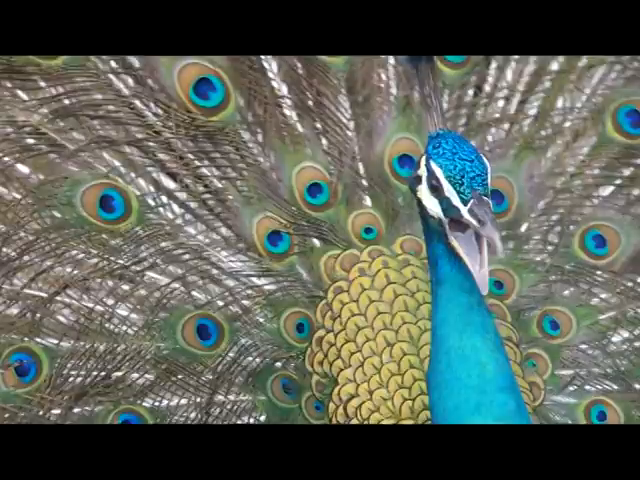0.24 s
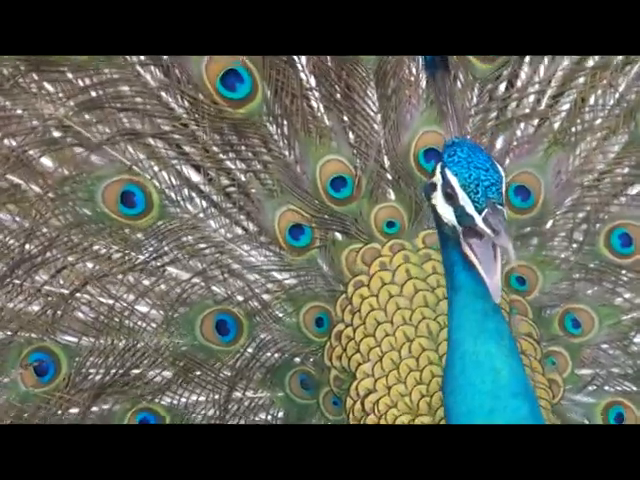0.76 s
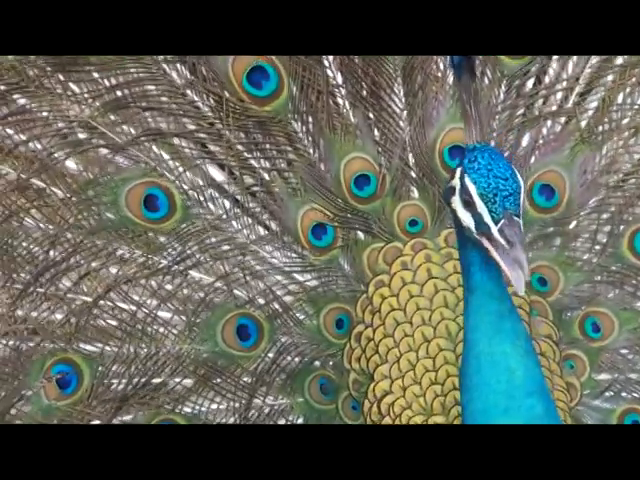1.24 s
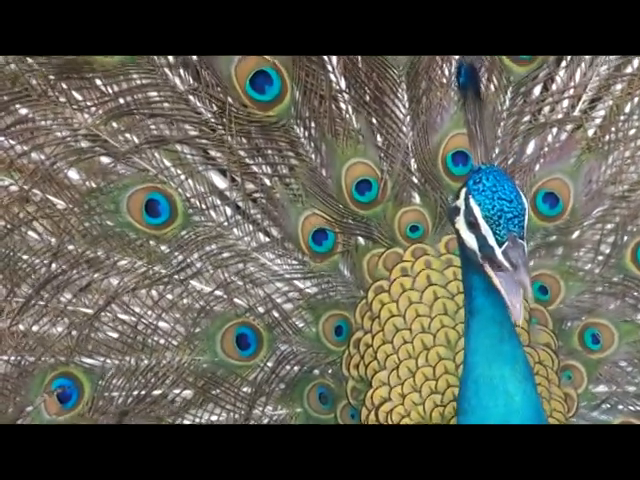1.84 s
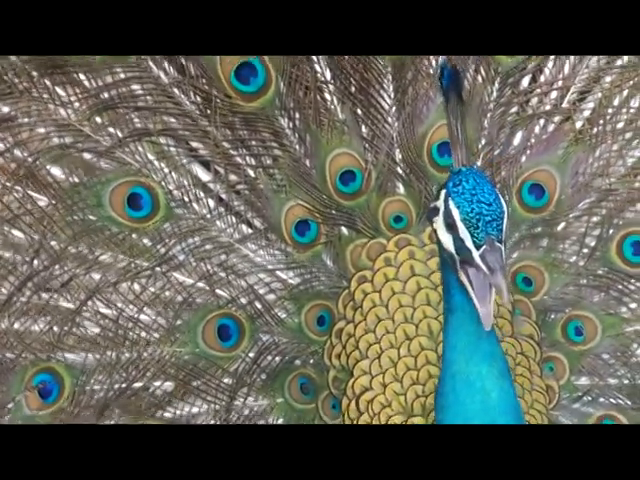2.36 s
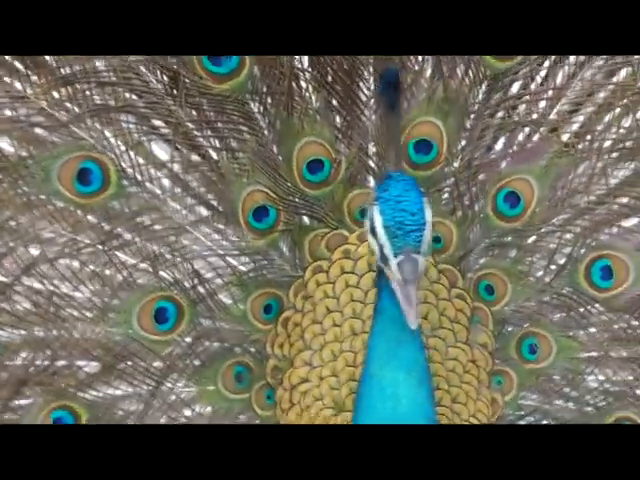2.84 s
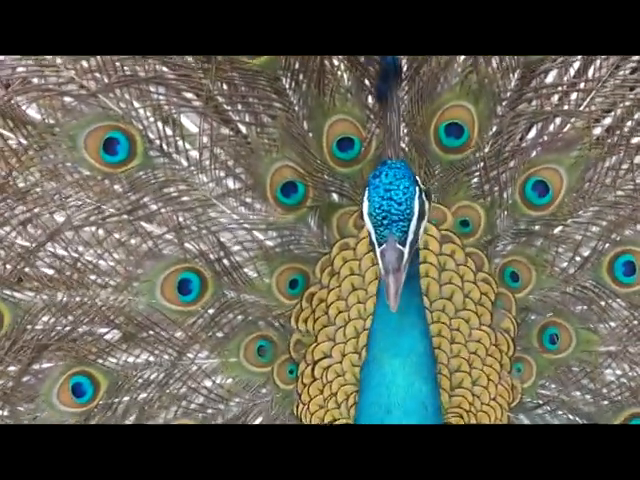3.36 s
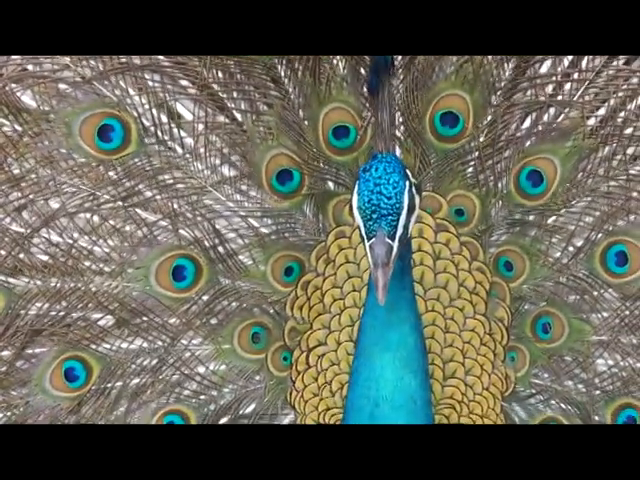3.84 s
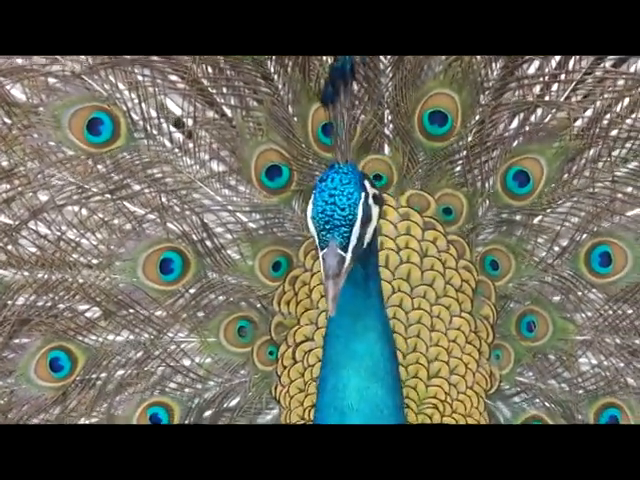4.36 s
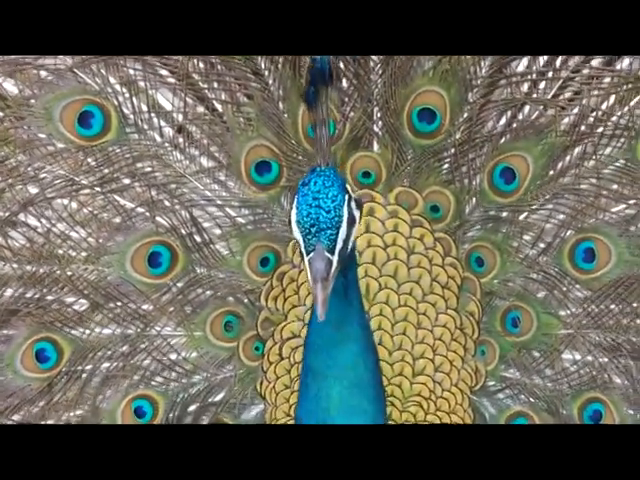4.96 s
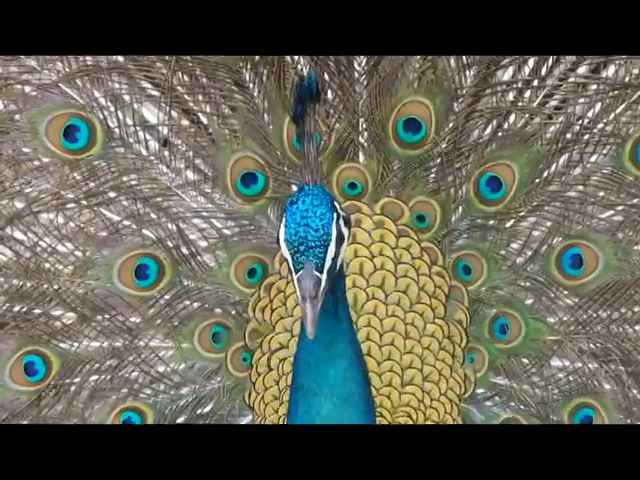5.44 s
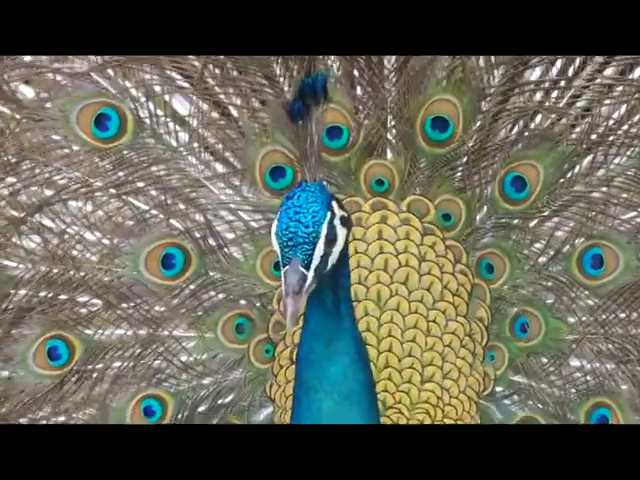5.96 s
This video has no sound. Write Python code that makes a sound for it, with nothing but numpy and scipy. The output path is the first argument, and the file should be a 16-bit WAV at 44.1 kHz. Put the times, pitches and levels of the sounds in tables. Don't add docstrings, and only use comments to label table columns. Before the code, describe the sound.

Four loud nasal peacock cries ring close by in a covered aviary, followed by low wind buffeting and scattered knocks and scrapes.

```python
import sys
import numpy as np
from scipy import signal
from scipy.fft import rfft, irfft, next_fast_len
from scipy.io import wavfile
from scipy.ndimage import uniform_filter1d

SR = 44100
rng = np.random.default_rng(int(sys.argv[2]) if len(sys.argv) > 2 else 0)


def convert_level_to_amplitude(level_db):
    exponent = np.asarray(level_db, float) / 20
    return 10 ** exponent


def inscribe(sig):
    pcm = np.round(np.clip(np.atleast_2d(sig).T, -1, 1) * 32767)
    wavfile.write(sys.argv[1], SR, pcm.astype(np.int16))


N = 273420

# (time [s], pitch [Hz], beak opening [dB])
CALLS = [
    [(0, 633.6, 6), (0.03, 640.2, 7.5), (0.07, 649.5, -0.5), (0.13, 650.2, 2), (0.19, 650, -9.5),
     (0.235, 636, 5.5), (0.29, 621.4, 0), (0.35, 609.2, 0), (0.41, 583.4, 5.5)],
    [(0.638, 557, -3.5), (0.66, 594.4, -2.5), (0.69, 620.6, -3), (0.73, 641, 4.5), (0.78, 649.7, 4.5),
     (0.85, 653.5, -2), (0.93, 637.6, 4), (1.01, 615.7, 2), (1.09, 582.6, 3.5)],
    [(1.376, 552, -4), (1.4, 593, -2), (1.44, 624.4, -2.5), (1.5, 649.2, 6.5), (1.6, 658.6, -5.5),
     (1.68, 650.2, -6), (1.76, 627, 1), (1.84, 613.4, 1), (1.905, 585, -0.5)],
    [(2.224, 549, -7.5), (2.245, 588.5, -7), (2.29, 629.8, -1.5), (2.34, 650.6, 4), (2.44, 662, -3),
     (2.54, 660.4, -8.5), (2.64, 626.6, 3), (2.73, 609, -4.5), (2.83, 582.7, -27)],
]
# (frequency [Hz], level [dB])
WASH_COLOUR = [(30, -43), (75, -10.5), (200, -1.5), (600, -4), (1000, 1.5), (1500, -6), (2400, -9.5),
               (3500, -22), (4500, -23), (6000, -17.5), (8000, -20.5), (10000, -28.5), (11300, -33.5),
               (11900, -72), (13000, -80)]


def evened(x):
    return x / np.sqrt(np.mean(x ** 2) + 1e-20)


def read(points, hz):
    f, value = np.transpose(points)
    return np.interp(np.log(hz + 1), np.log(f + 1), value)


def curve(rows):
    s, *columns = np.transpose(rows)
    return [np.interp(np.arange(N) / SR, s, c) for c in columns]


def coloured(x, gain):
    size = next_fast_len(x.shape[-1] + 4096)
    return irfft(rfft(x, size) * gain(np.fft.rfftfreq(size, 1 / SR)), size)[..., :x.shape[-1]]


def modes(table, hz):
    return sum((-1) ** k * convert_level_to_amplitude(db) / (1 + 2j * (hz - f) / w) for k, (f, w, db) in enumerate(table))


def slow(rows, count, size):
    coarse = uniform_filter1d(rng.standard_normal((rows, count // size * 8 + 30)), size=8)
    at = np.linspace(0, coarse.shape[1] - 1, count)
    return evened(np.array([np.interp(at, np.arange(len(c)), c) for c in coarse]))


def low_partials(hz, turns, shake, low_db, wobble):
    tone = 0
    for k, db, lift_db in zip(range(1, 6), low_db, (.6, 1.5, 2.5, 3.0, 6.0)):
        level = convert_level_to_amplitude(db + lift_db + 0.69 * wobble[k])
        throat_turn = np.arctan((k * hz - 2330) / 150)
        tone = tone - level * np.cos(2 * np.pi * k * (turns + shake) - throat_turn)
    return tone * np.ones((2, 1))


def high_partials(hz, turns, jitter, bright_db, opening_db, sheen_db, beak_hz, wobble):
    # (frequency [Hz], width [Hz], level [dB])
    throat = [(3150, 1700, -1.5), (4190, 280, 7.5), (4940, 82, 5), (5710, 610, -2), (7570, 140, -7),
              (9050, 610, -9.5), (9080, 150, -11), (9740, 690, -19.5)]
    membrane_db = (-0.5, 0, 2, 0, 3.5, 4, -1, 0.6, -0.8, -2.5, 5, 3, 9)
    tone = np.zeros((2, len(hz)))
    ring_hz = beak_hz + 6.6 * (hz - 620)
    sheen = sheen_db * np.clip((hz - 628) / 18, 0, 1)
    for k in range(6, 19):
        ring_db = (11.1 + 0.87 * sheen) / (1 + ((k * hz - ring_hz) / 600) ** 2)
        extra_db = 0.26 * sheen if k > 9 else 0.84 * opening_db
        gain = modes(throat, k * hz) * convert_level_to_amplitude(bright_db + membrane_db[k - 6] + extra_db + ring_db)
        together_db, apart_db = min(k - 4, 5) * np.array([.4, .55])
        sides = np.array([[1], [-1]])
        waver = convert_level_to_amplitude(together_db * wobble[2 * k - 5] + apart_db * wobble[2 * k - 4] * sides)
        tone += waver * (gain * np.exp(2j * np.pi * k * (turns + jitter))).real
    return tone


def breath_puffs(turns):
    # (frequency [Hz], level [dB])
    breath_colour = [(300, -12), (1100, -3.5), (2300, -1.5), (3000, 3.5), (4800, -12), (6000, -6),
                     (7500, -7), (10000, -10), (11500, -40)]
    common, apart = rng.standard_normal((2, len(turns)))
    puffs = (1.0 + np.cos(2 * np.pi * turns)) * (common + 2.6 * apart * np.array([[1], [-1]]))
    return evened(coloured(puffs, lambda f: convert_level_to_amplitude(read(breath_colour, f))))


def scream(rows, beak_hz, stretch, level_db, sheen_db, fifth_db):
    # (pitch [Hz], level [dB])
    partials = [
        [(550, -26), (590, -24.5), (609, -22.5), (627, -26), (638, -28.5), (650, -26.5), (663, -25)],
        [(550, -18), (590, -21), (610, -16.5), (628, -21), (640, -21.5), (652, -29.5), (663, -31.5)],
        [(550, -23.5), (590, -30.5), (610, -35.5), (620, -26.5), (629, -16.5), (638, -22), (650, -15.5),
         (663, -11)],
        [(550, -17), (595, -20), (611, -13), (627, -23.5), (640, -40.5), (654, -27), (663, -20)],
        [(550, -50.5), (590, -43), (610, -39), (627, -45.5), (640, -34.5), (663, -34)],
    ]
    opening_share = (0.01, 0.01, 0.046, 0.6)
    attack_s, release_s = .013, .040
    attack_db, release_db = (-23, -17, -46, -30, -32), (-58, -29, -46, -30, 22)

    s, *columns = np.transpose(rows)
    start, end = max(s[0] - attack_s, 0), s[-1] + release_s
    t = np.arange(start, end, 1 / SR)
    hz, opening_db = (uniform_filter1d(np.interp(t, s, c), size=800) for c in columns)
    rise = np.clip((s[0] - t) / attack_s, 0, 1)
    fall = np.clip((t - s[-1]) / release_s, 0, 1)
    hz = hz * (1 - 0.027 * rise) * (1 - .18 * fall ** 2)

    effort_db = level_db + 2 * np.exp((start - t) / 0.12) - 2.5 * np.exp((t - end) / 0.19)
    climbing = np.clip(uniform_filter1d(np.gradient(hz) * SR, size=1500) / 300, 0, 1)
    tuned_hz = hz * (1 - (stretch + 0.82 * climbing) / 100)
    levels_db = []
    for table, share, a, r in zip(partials, (*opening_share, 0), attack_db, release_db):
        edge_db = a * rise + r * fall ** 2.1
        levels_db.append(read(table, tuned_hz) + effort_db + share * opening_db + edge_db)
    *low_db, bright_db = levels_db
    low_db.append(0.22 * low_db[2] - 31.5 + fifth_db + 0.64 * opening_db - 40 * fall)
    bright_db = bright_db + np.minimum(low_db[0] + 25, 0)

    wobble = slow(34, len(t), size=1700)
    turns = np.cumsum(hz * (1 + .001 * wobble[0])) / SR
    slide = uniform_filter1d(abs(np.gradient(hz)) * SR, size=900)
    jitter = np.clip((slide - 600) / 50000, .0028, .025) * slow(1, len(t), size=80)[0]
    tone = low_partials(hz, turns, .12 * jitter, low_db, wobble)
    tone += high_partials(hz, turns, jitter, bright_db, opening_db, sheen_db, beak_hz, wobble)

    gasp_db = 9 * np.exp((s[0] - t) / .05) * (start > 0)
    sigh_db = 34 * fall ** 1.46
    breath_db = -20 - .08 * (hz - 620) + 1.5 * wobble[-1] + sigh_db + gasp_db + .4 * opening_db
    breath = convert_level_to_amplitude(breath_db + low_db[0]) * breath_puffs(turns)

    edges = np.clip(np.minimum(t - start + .002, end - t) / .004, 0, 1)
    out = np.zeros((2, N))
    out[:, round(start * SR):][:, :len(t)] = edges * (-np.sqrt(2) * tone + breath)
    return out


def peacock():
    fifth_db = (-4, -2.5, 2, 2.5)
    beak_hz, stretch = (6950, 7860, 7800, 7580), (-0.45, -0.0089, 0.17, 0.47)
    effort_db, sheen_db = (0.12, .1, 0.26, 0.18), (9.5, 4, -1, -2)
    return sum(scream(*call) for call in zip(CALLS, beak_hz, stretch, effort_db, sheen_db, fifth_db))


def aviary(x):
    # (frequency [Hz], time [s])
    dying = [(300, 0.31), (1200, 0.27), (1800, 0.46), (3000, 0.38), (10000, 0.21)]
    taps = rng.choice([-1., 1.], (2, SR // 2)) * (rng.random((2, SR // 2)) < .05)
    taps[:, :300] = 0
    hz, t, z = signal.stft(taps, SR, nperseg=256)
    tail = signal.istft(z * convert_level_to_amplitude(-60 * t / read(dying, hz)[:, None]), SR, nperseg=256)[1]
    return signal.fftconvolve(x[None], tail / np.linalg.norm(tail[0]), axes=1)[:, :N]


def ticks():
    # (time [s], peak level [dB], treble against body [dB], time for the fizz to die by 60 dB [s])
    scrapes = [
        (2.8537, -41.5, -25, 0.075),
        (4.448, -50, 13, 0.077),
        (4.669, -22, -6, 0.042),
        (4.794, -15.5, -13, 0.09),
        (4.9276, -29, -7, 0.08),
        (5.112, -44.5, 10, 0.098),
        (5.5032, -18.5, -8.5, 0.23),
    ]
    # (frequency [Hz], width [Hz], level [dB])
    hollow = [(900, 450, 1), (1500, 600, -2), (2350, 700, 2)]
    out, t = np.zeros(N + 8000), np.arange(8000) / SR
    for s, peak_db, treble_db, t60 in scrapes:
        raw = rng.standard_normal(8000)
        body = evened(coloured(raw, lambda hz: modes(hollow, hz)))
        fizz = evened(coloured(raw, lambda hz: convert_level_to_amplitude(read(WASH_COLOUR, hz)) * (hz > 3000)))
        fade = convert_level_to_amplitude(-60 * np.maximum(t - .005, 0) / np.array([[.04], [t60]]))
        held = np.minimum(t / .001, 1) * fade
        out[round(s * SR):][:8000] += convert_level_to_amplitude(peak_db - 2) * (body * held[0] + convert_level_to_amplitude(treble_db) * fizz * held[1])
    return out[:N]


def gain_control():
    t, pulls = np.arange(N) / SR, []
    lead_s = 0.36 / 2
    for rows, deepest_db in zip(CALLS, (-20, -19, -20, -19.5)):
        s, hz = np.transpose(rows)[:2]
        top = s[np.argmax(hz)]
        back_db = 16.5 * np.maximum(t - top, 0) + 14 * np.maximum(t - s[-1] - .1, 0)
        pulls.append(deepest_db * np.clip((t - s[0] + lead_s) / (top - s[0] + lead_s), 0, 1) + back_db)
    return np.minimum(np.min(pulls, axis=0), 0)


def noise(spectrum, patchy_db, flicker_db, size):
    # (frequency [Hz], likeness [0-1])
    likeness = [(60, 1), (300, 1), (520, 1), (900, 1), (1500, 0.79), (2050, 0.18), (2500, 0.82),
                (4000, 0.069), (6000, 0.8), (9000, 0.96), (10500, 0.23)]
    frames, hz = 4 * N // size + 5, np.fft.rfftfreq(size, 1 / SR)
    a, b, c, d, patches = rng.standard_normal((frames, len(hz), 5)).T
    patches = evened(uniform_filter1d(uniform_filter1d(patches, size=6, axis=0), size=10, axis=1))
    flicker = evened(uniform_filter1d(rng.standard_normal(frames), size=2))
    same = np.clip(read(likeness, hz), 0, 1)[:, None]
    left = a + 1j * b
    right = same * left + np.sqrt(1 - same ** 2) * (c + 1j * d)
    level_db = read(spectrum, hz)[:, None] + patchy_db * patches + flicker_db * flicker
    z = np.array([left, right]) * convert_level_to_amplitude(level_db)
    return evened(signal.istft(z, nperseg=size, noverlap=3 * size // 4)[1][:, :N])


def wind(pull_db):
    # (time [s], peak level [dB], half length [s])
    gust_list = [(0, -25, 0.42), (0.336, -33, 0.041), (0.599, -58, 0.19), (0.984, -32, 0.066),
                 (1.36, -26.5, 0.072), (1.517, -29, 0.089), (1.777, -29, 0.15), (2.01, -22, 0.032),
                 (2.115, -32.5, 0.047), (2.213, -23, 0.024), (2.47, -28, 0.079), (2.943, -32, 0.072),
                 (3.24, -17, 0.024), (3.325, -23, 0.089), (3.538, -34.5, 0.063), (3.811, -22.5, 0.037),
                 (3.956, -23.5, .04), (4.11, -32.5, 0.12), (4.24, -27, 0.015), (4.338, -21, 0.011),
                 (4.443, -27, 0.045), (4.734, -22, 0.099), (4.857, -36, 0.076), (5.038, -34.5, 0.14),
                 (5.324, -40, 0.076), (5.43, -34, 0.032), (5.654, -34, 0.15), (5.766, -22, 0.062),
                 (6.008, -23.5, 0.05), (6.132, -38.5, 0.06)]
    # (frequency [Hz], level [dB])
    buffet = [(25, -48), (60, -39), (110, -9), (160, -7), (215, 1.5), (280, -3), (400, -9.5), (600, -17),
              (1000, -28), (1500, -56)]
    raw = noise(buffet, 1.4, 1.0, size=1024)
    t = np.arange(0, N / SR + .01, .005)
    swell = uniform_filter1d((raw ** 2).mean(axis=0), size=2000)
    lull_db = -49
    gusts = convert_level_to_amplitude(lull_db) + sum(convert_level_to_amplitude(db - 10 * abs(t - s) / max(half, .01)) for s, db, half in gust_list)
    levelled = evened(raw / (abs(swell) + .05) ** 0.56)
    return convert_level_to_amplitude(1.18 * pull_db) * np.interp(np.arange(N) / SR, t, gusts) * levelled


def wash(pull_db):
    return convert_level_to_amplitude(-30 + pull_db) * noise(WASH_COLOUR, 1.0, 0.1, size=512)


def far_bird():
    # (time [s], pitch [Hz], level [dB])
    whistle = [
        (2.09, 1630, -75),
        (2.13, 1623, -34),
        (2.21, 1635, -26),
        (2.24, 1640, -78),
    ]
    hz, db = curve(whistle)
    sounding = (hz != hz[0]) * (hz != hz[-1])
    return convert_level_to_amplitude(db) * sounding * np.sin(2 * np.pi * np.cumsum(hz) / SR)


def camera_whine(pull_db):
    return convert_level_to_amplitude(-64 - 29 + pull_db) * np.sin(2 * np.pi * 7812 * np.arange(N) / SR)


def ports(pair, balance, phase):
    tilt = lambda hz: convert_level_to_amplitude(read(balance, hz) / 2) * np.exp(.5j * read(phase, hz))
    return coloured(pair, lambda hz: np.array([tilt(hz), 1 / tilt(hz)]))


def scene():
    # (frequency [Hz], difference [dB])
    bird_balance = [(200, -13), (620, 6), (1200, -1), (1650, -10), (1820, -10.5), (1960, 0), (2450, -2),
                    (3300, -4.5), (6200, -4.5), (9000, -12), (11100, -14.5)]
    wash_balance = [(60, 1.5), (96, 1.5), (160, 1.0), (250, 2.0), (400, 3.0), (640, 3.5), (1040, 1.0),
                    (1660, -3.0), (2670, -3.0), (4300, -5.5), (6910, -6.0), (11100, -13.5)]
    # (frequency [Hz], phase [rad])
    bird_phase = [(0, 9.5), (340, 2.5), (950, -2.47), (1810, -0.5), (2400, -2), (4220, -3), (5510, -2.5),
                  (6720, -2), (9220, -6), (11300, -3)]
    wash_phase = [(0, 0), (340, -0.4), (1120, -2.4), (1720, -3.4), (2410, -2.1), (2930, -2.9), (4570, -2.9),
                  (5600, -3.3), (7240, -4.5), (8350, -4.8), (9470, -5.3), (10500, -4.5), (10900, -3.6),
                  (11300, -8.2)]
    bird = peacock()
    near = bird + convert_level_to_amplitude(-19) * aviary(bird.mean(axis=0)) + ticks()
    pull_db = gain_control()
    around = wind(pull_db) + wash(pull_db) + far_bird() + camera_whine(pull_db)
    return ports(near, bird_balance, bird_phase) + ports(around, wash_balance, wash_phase)


def band_limit(x):
    return signal.sosfilt(signal.butter(12, 11710, fs=SR, output="sos"), x)


def record(dry):
    # (frequency [Hz], width [Hz])
    notches = [(3000, 900), (4000, 1100), (5000, 1100)]
    for hz, width in notches:
        dry = signal.lfilter(*signal.iirnotch(hz, hz / width, SR), dry)
    dry = signal.sosfilt(signal.butter(2, 60, "high", fs=SR, output="sos"), dry)
    dry = signal.sosfilt(signal.cheby2(10, 36, 11900, fs=SR, output="sos"), dry)
    return band_limit(dry)


dry = scene()
out = record(dry)
inscribe(out)
```